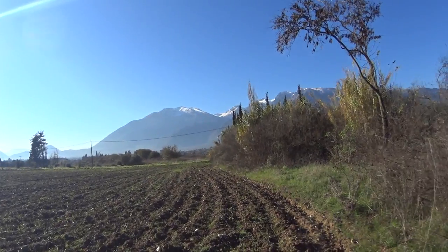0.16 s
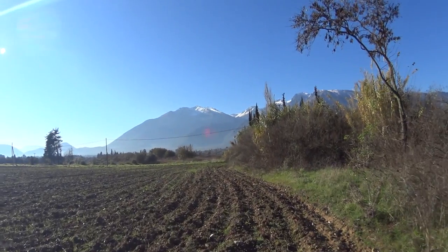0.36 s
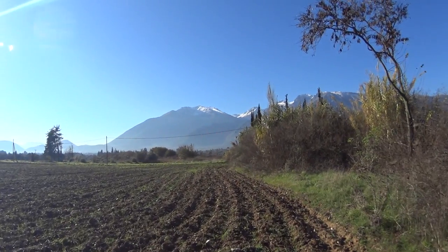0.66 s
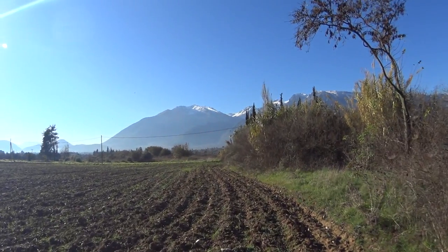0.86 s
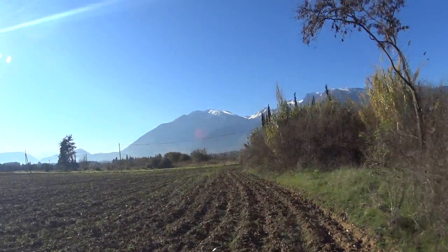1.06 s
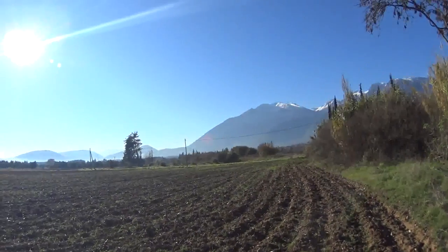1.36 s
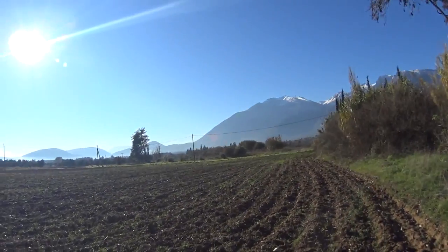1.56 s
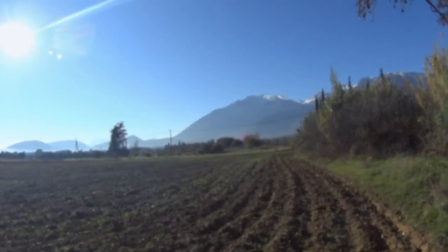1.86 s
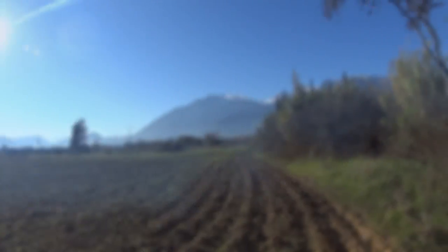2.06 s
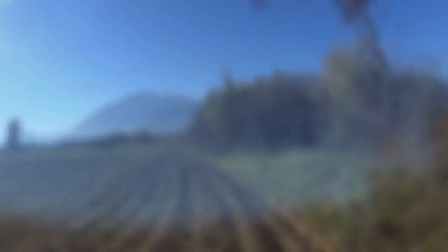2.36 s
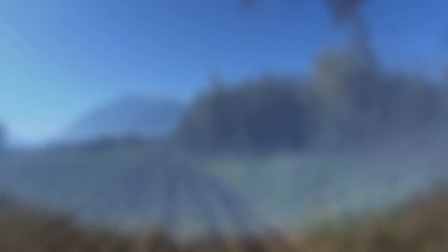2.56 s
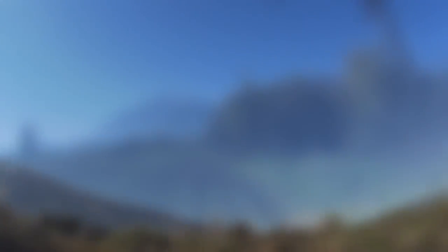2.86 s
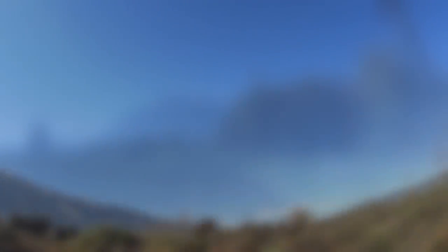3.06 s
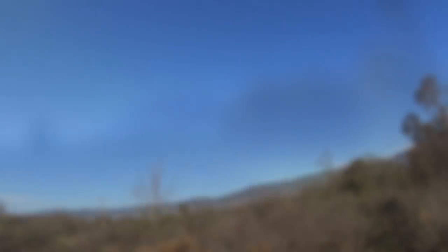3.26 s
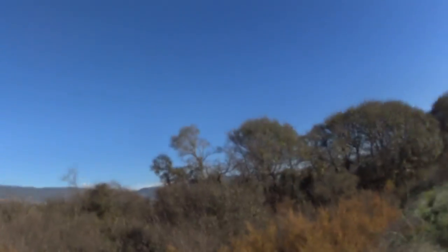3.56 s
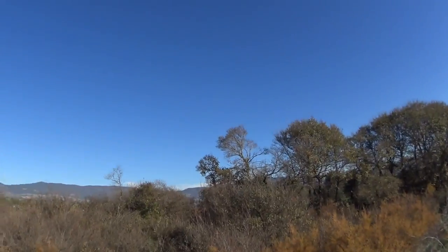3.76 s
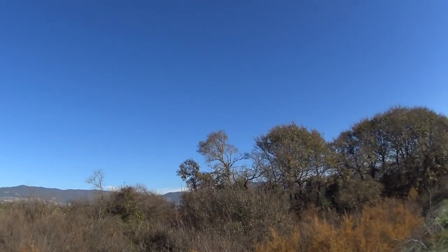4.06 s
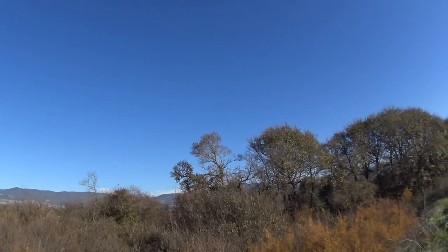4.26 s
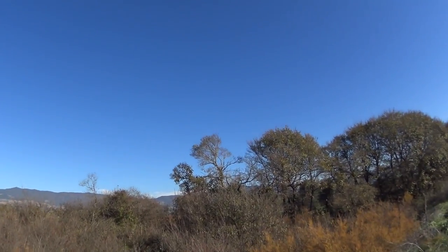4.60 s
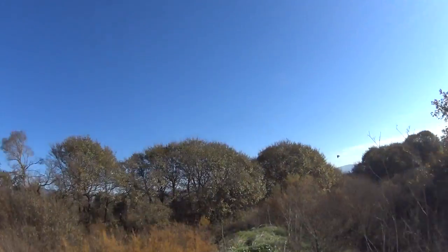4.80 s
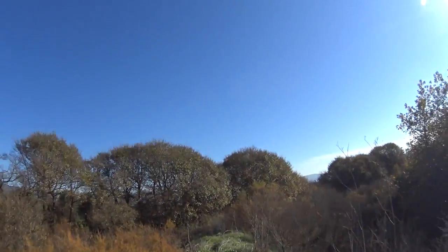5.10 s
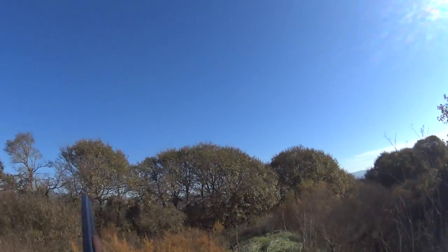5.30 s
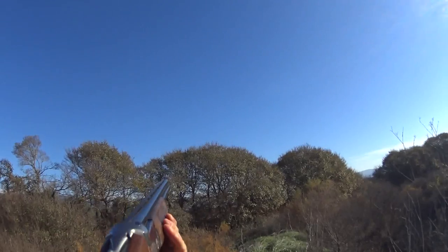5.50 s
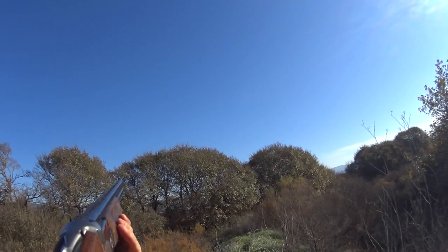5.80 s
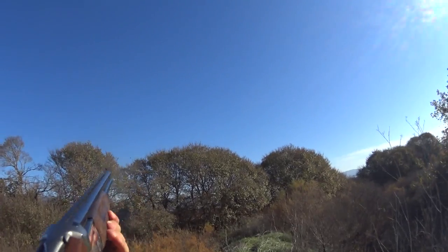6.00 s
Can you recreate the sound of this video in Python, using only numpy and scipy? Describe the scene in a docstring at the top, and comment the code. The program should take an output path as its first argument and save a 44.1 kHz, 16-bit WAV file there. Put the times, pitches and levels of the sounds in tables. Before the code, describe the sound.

A hunter stands in a still field wearing a small stereo camera on the head. Thin hiss, a faint far hum and sparse high chirps, with light cloth rustles, twig ticks and hollow housing knocks. After a calm middle, a hard knock and busy rustling mark the gun being raised. A brief lock rattle, then a shotgun blast very close, its dense roar still ringing when the sound stops.

```python
"""Soft air hiss, a faint far hum and bird chirps; cloth rustles, twigs tick, knocks ring, then a shotgun blast roars.
A hunter in a quiet field wears a small stereo camera on his head and raises his gun; the hammer falls and it fires.
Hiss, rustle, echoes and rumble are shaped noise; hum and birds are sines; most knocks are decaying housing tones.
A limiter in the camera holds the rolling echoes at an even roar."""
import sys
import numpy as np
from scipy import signal
from scipy.fft import rfft, irfft
from scipy.io import wavfile
from scipy.ndimage import uniform_filter1d

SR = 44100
rng = np.random.default_rng(int(sys.argv[2]) if len(sys.argv) > 2 else 0)


def wrap_up_sound(samples):
    """Save the sound to the file named by the first command line argument, as 16-bit audio."""
    columns = np.atleast_2d(samples).T
    # keep every value between -1 and 1, then stretch to whole-number steps
    tamed = np.clip(columns, -1, 1)
    steps = np.round(tamed * 32767).astype(np.int16)
    wavfile.write(sys.argv[1], SR, steps)


def invert_db(x):
    """Field ratio 10**(x/20) for x, a level in decibels (scalar or array-like)."""
    u = np.asarray(x, float) / 20
    return 10 ** u


N = 270906  # length in samples

# how alike the left and right sides of the quiet noises are: f/Hz, likeness (-1 to 1)
LIKENESS = [(60, -0.22), (170, 0.52), (490, -0.31), (1410, 0.34), (4050, 0.18), (11600, 0.58)]


def read(points, hz):
    """Value of a (f/Hz, value) table at the pitches hz, read along a log axis."""
    f, value = np.transpose(points)
    return np.interp(np.log(hz + 1), np.log(f + 1), value)


def curve(rows, t):
    """Value columns of a (t/s, ..) table at the times t."""
    s, *columns = np.transpose(rows)
    return [np.interp(t, s, c) for c in columns]


def evened(x):
    """Scales a signal to rms 1."""
    return x / np.sqrt(np.mean(x ** 2) + 1e-20)


def add(mix, s, sound, pan_db=0):
    """Adds a sound at s seconds, with the left side pan_db louder than the right."""
    part = mix[:, round(s * SR):][:, :sound.shape[-1]]
    part += sound[..., :part.shape[1]] * invert_db(np.array([[.5], [-.5]]) * pan_db)


def noise(length, size, field_db, same, patchy_db):
    """Stereo noise from random short-time spectra; field_db(hz, s) colours it, random patches drift through."""
    # left minus right level: f/Hz, level/dB
    side_lean = [(60, -0.5), (220, -1.5), (830, -1), (3110, -1), (11600, 0)]
    hz = np.fft.rfftfreq(size, 1 / SR)[:, None]
    t = np.arange(4 * length // size + 5) * size / 4 / SR
    a, b, c, d, patches = rng.standard_normal((len(t), len(hz), 5)).T
    patches = uniform_filter1d(patches, size // 64, 0)  # smooth over pitch
    patches = evened(uniform_filter1d(patches, 8192 // size, 1))  # smooth over time
    like = np.clip(read(same, hz), -1, 1)
    left = a + 1j * b
    right = like * left + np.sqrt(1 - like ** 2) * (c + 1j * d)
    lean_db = np.array([.5, -.5])[:, None, None] * read(side_lean, hz)
    spectra = np.array([left, right]) * invert_db(field_db(hz, t) + patchy_db * patches + lean_db)
    return signal.istft(spectra, nperseg=size, noverlap=size * 3 // 4)[1][:, :length]


def wavering(count, per_s, depth_db):
    """Random gain that changes about per_s times a second, by depth_db rms."""
    size = round(SR / per_s)
    drift = uniform_filter1d(uniform_filter1d(rng.standard_normal(count), size), size)
    return invert_db(depth_db * evened(drift))


def note(s, length, from_hz, to_hz, db, peak, start_db, end_db):
    """Pitch and level curve of a glide that swells to one peak, then fades towards its end level."""
    peak_hz = from_hz + 0.61 * (to_hz - from_hz)  # share of the glide done at the loudest moment
    return [(s, from_hz, db + start_db), (s + peak * length, peak_hz, db), (s + length, to_hz, db + end_db)]


def whistle(rows, fade_s):
    """A sine along a (t/s, f/Hz, rms level/dB) curve, faded at both ends."""
    t = np.arange(rows[0][0], rows[-1][0], 1 / SR)
    hz, db = curve(rows, t)
    fade = np.clip(np.minimum(t - t[0], t[-1] - t) / fade_s, 0, 1)
    turns = np.cumsum(hz) / SR + rng.random()
    return np.sqrt(2) * invert_db(db) * fade * np.sin(2 * np.pi * turns)


def fuzzy(length_s, from_hz, to_hz, width_hz):
    """A gliding band of noise that swells and fades: a sine multiplied by slow noise."""
    count = round(length_s * SR)
    size = max(round(SR / width_hz / 2), 1)
    breathy = evened(uniform_filter1d(uniform_filter1d(rng.standard_normal(count), size), size))
    glide = np.sin(2 * np.pi * np.cumsum(np.linspace(from_hz, to_hz, count)) / SR)
    return 2 * breathy * glide * signal.windows.tukey(count, .7)


def hiss():
    """Steady fine-grained self-noise of the two microphone capsules, at -66 dB rms."""
    # colour of the self-noise: f/Hz, level per Hz/dB (relative)
    capsule_colour = [(20, -30), (300, 13), (2000, -26), (5000, 1), (8000, -3.5), (11500, -4), (15000, -40)]
    grains = noise(N, 1024, lambda hz, t: read(capsule_colour, hz), LIKENESS, patchy_db=1.5)
    return invert_db(-66) * evened(grains)


def air():
    """Distant hiss of the still field, heard through the housing, with a slight flutter."""
    # colour of the field through the housing: f/Hz, level per Hz/dB (relative)
    field_colour = [(15, -32), (25, -6), (43, -25), (65, -16), (185, -10.5), (301, -14.5), (325, -31),
                    (351, -8), (1140, -8.5), (1370, -0.5), (1550, -14.5), (2280, -8.5), (3440, -14),
                    (10600, -27), (11500, -25), (15000, -70), (22000, -120)]
    # loudness over time, before a steady lift: t/s, level/dB
    field_level = [(0.0, -65), (1.1, -62), (1.4, -61.5), (2.3, -63), (2.78, -65.5), (3.78, -60.5),
                   (5.18, -59), (5.42, -54), (5.59, -58.5), (5.9, -58)]
    level_db, = curve(field_level, np.arange(N) / SR)
    flutter = wavering(N, per_s=230, depth_db=1.0)
    field = evened(noise(N, 1024, lambda hz, t: read(field_colour, hz), LIKENESS, patchy_db=.5))
    return invert_db(level_db + 4.5) * flutter * field  # 4.5 dB: the steady lift


def rustle():
    """Rubbing noise broken up by tiny slips; brush brightens it above the housing resonances."""
    # rubbing cloth and brush through the housing resonances: f/Hz, level per Hz/dB (relative)
    rub_colour = [(90, -31), (150, -19), (460, -9.5), (800, -14), (1150, -10.5), (1380, -5), (1600, -9),
                  (1870, -5.5), (2080, -12), (2330, -3.5), (2600, -12), (3000, -16.5), (4900, -6.5),
                  (7500, -18), (9800, -12.5), (11500, -14), (15000, -60)]
    # movements of the body: start/s, length/s, level before a 1 dB lift/dB, treble tilt/dB
    moves = [(0.162, 0.12, -53.5, -10.5), (0.31, .08, -58, -32), (0.44, 0.11, -59, -13),
             (0.633, 0.18, -62, -4), (0.885, 0.22, -53.5, -12.5), (1.03, 0.32, -55, -17.5),
             (1.41, 0.2, -64, -9), (1.642, 0.29, -56, -0.5), (1.895, 0.27, -58.5, -13),
             (2.176, 0.48, -56.5, -9), (2.302, 0.14, -52, -8), (2.581, 0.082, -55.5, -36),
             (2.758, 0.91, -57.5, -18.5), (3.193, 1.5, -61.5, -22), (3.415, 0.15, -60.5, -31),
             (4.425, .06, -65, 2), (4.515, 0.036, -63, -19), (4.812, 0.05, -54, -26),
             (5.068, 0.21, -55.5, -17), (5.209, 0.37, -45.5, -11.5), (5.438, 0.14, -53, -7),
             (5.503, 0.39, -55.5, -18)]
    rise, fall = 0.16, 0.4  # shares of each movement's length
    rest_db, rest_bright_db = -70.5, -2  # standing still: level before the lift, treble tilt
    t = np.arange(N) / SR
    s, length, db, bright_db = np.transpose(moves)[:, :, None]
    done = (t - s) / length
    swell = np.clip(np.minimum(done / rise, (1 - done) / fall), 0, 1)
    power = (invert_db(db) * swell) ** 2
    rest_power = invert_db(rest_db) ** 2
    total = power.sum(0) + rest_power
    top_db = ((power * bright_db).sum(0) + rest_power * rest_bright_db) / total

    def field_db(hz, at):
        """Rubbing colour, with a treble tilt that sets in at 3 kHz and is complete at 9 kHz."""
        treble = np.clip(np.log2(hz / 3000 + 1e-3) / 1.58, 0, 1)
        return read(rub_colour, hz) + np.interp(at, t, top_db) * treble

    strength = invert_db(3.6 * np.minimum(rng.exponential(1, N), 6))
    slips = strength * (rng.random(N) < 300 / SR)  # about 300 slips a second
    fading = signal.lfilter([1], [1, -np.exp(-1 / (0.0017 * SR))], slips)  # each dies over 1.7 ms
    grain = evened(2.24 + fading)
    return np.sqrt(total) * invert_db(1.0) * grain * evened(noise(N, 512, field_db, LIKENESS, patchy_db=3.5))


def buffet():
    """Lumpy rumble as the head moving in the air shakes the capsules; each shake swells fast and dies slower."""
    # shakes: peak t/s, level/dB
    shakes = [(.01, -73), (.2, -63), (.41, -69), (.97, -57), (1.08, -62), (1.52, -63.5), (1.76, -57),
              (2.3, -66), (2.42, -59), (2.63, -67), (3.2, -63), (3.41, -63.5), (4.75, -67), (5.17, -46),
              (5.23, -48), (5.3, -48), (5.4, -43), (5.49, -49), (5.6, -56.5), (5.96, -53)]
    rise_db_per_s, fall_db_per_s, rest_db = 165, 110, -74

    def field_db(hz, t):
        """Falls off above about 60 Hz; nearly nothing below 15 Hz."""
        return -20 * np.log10(1 + (hz / 60) ** 2) - 100 * (hz < 15)

    rumble = noise(N, 2048, field_db, [(20, 0.93), (300, 0.99)], patchy_db=3.0)  # nearly alike on both sides
    s, db = np.transpose(shakes)[:, :, None]
    after = np.arange(N) / SR - s
    level_db = (db - np.maximum(-rise_db_per_s * after, fall_db_per_s * after)).max(0)
    return np.hypot(invert_db(level_db), invert_db(rest_db)) * evened(rumble)


def hum():
    """Faint far tones; the air they cross makes them waver, the higher the faster and deeper."""
    # steady tones that come and go: start/s, length/s, f/Hz, rms level at the peak before wavering/dB
    tones = [(0, .55, 647.5, -64), (.4, .43, 647.5, -68), (0, .4, 336, -70), (.35, .55, 326, -68),
             (1.15, .56, 338, -62.5), (1.7, 1.85, 335.5, -70), (1.05, .65, 288, -71),
             (1.08, .24, 1868, -64), (1.53, .08, 1850, -66), (1.92, .38, 1870, -66.5)]
    out = np.zeros((2, N))
    for s, length, hz, db in tones:
        rows = note(s, length, hz, hz, db, peak=0.34, start_db=-6, end_db=-7)
        tone = whistle(rows, fade_s=0.0083)
        waver = wavering(len(tone), hz / 9, depth_db=1.7 * np.sqrt(hz / 330))
        add(out, s, tone * waver, pan_db=-2.5)
    return out


def birds():
    """Near-sine chirps, the fainter the hazier; the hedge scatters each into a short fluttering echo."""
    # notes of far birds: start/s, length/s, from f/Hz, to f/Hz, rms level at the peak before haze/dB
    chirps = [(0.026, 0.082, 4650, 4720, -69), (0.121, .05, 4500, 4250, -74),
              (1.324, 0.079, 4400, 4700, -62), (1.39, 0.053, 4510, 4180, -65),
              (1.444, 0.02, 4130, 3980, -67), (1.979, 0.052, 2486, 2545, -60),
              (2.025, 0.13, 2680, 2640, -69), (2.299, 0.085, 4760, 4540, -58),
              (2.613, 0.047, 4680, 4560, -70), (2.65, .05, 4350, 4200, -69), (2.705, 0.1, 4630, 4330, -70),
              (4.426, 0.023, 10400, 7360, -54.5)]
    # call of the near bird, a sweep up into a held note: t after its start before stretching/s, f/Hz,
    # level relative to the call/dB
    call = [(0, 2250, -36), (.014, 2780, -21), (.027, 3350, -18), (.037, 3950, -11), (.041, 4080, -15),
            (.045, 4180, 0), (.055, 4290, 0), (.08, 4260, -2), (.088, 4200, -5)]
    # when the near bird calls: start/s, level/dB, time stretch (factor)
    calls_at = [(.743, -43, 0.99), (2.222, -43, 0.97)]
    # hoarse start of the call, a noise band: length/s, from f/Hz, to f/Hz, width/Hz
    rasp = (.042, 4300, 5600, 900)
    rasp_lead_s, rasp_db = .008, -16  # starts ahead of the call; gain relative to it
    overtone_s, overtone_db = .022, -18  # the octave that sounds along while the pitch is low
    out = np.zeros((2, N))
    songs = [note(*row, peak=0.4, start_db=-4, end_db=-5.5) for row in chirps]
    for s, db, stretch in calls_at:
        songs.append([(s + stretch * after, hz, db + step_db) for after, hz, step_db in call])
        low = curve(call, [0, overtone_s])[0]
        octave_db = db + overtone_db
        songs.append([(s, 2 * low[0], octave_db), (s + stretch * overtone_s, 2 * low[1], octave_db)])
        add(out, s - rasp_lead_s, invert_db(db + rasp_db) * fuzzy(*rasp))
    for rows in songs:
        tone = whistle(rows, fade_s=.006)
        faint_db = -38 - max(row[2] for row in rows)
        haze = wavering(len(tone), per_s=500, depth_db=0.16 * faint_db)
        add(out, rows[0][0], tone * haze, pan_db=-2.0)
    t = np.arange(SR // 2) / SR
    signs = rng.choice([-1., 1.], (2, len(t)))
    hits = rng.random((2, len(t))) < 1500 / SR  # about 1500 reflections a second
    leaves = signs * hits * invert_db(-60 * t / 0.38) * (t > .015)  # none in the first 15 ms
    echo = signal.fftconvolve(out, leaves / np.linalg.norm(leaves[0]), axes=1)[:, :N]
    return out + invert_db(-8.5) * echo


def ticks():
    """A noise burst around the pitch of the thing that snaps or bumps; it rises within about one cycle."""
    # dry twigs and straps; those near 1300 Hz are light knocks ringing the housing:
    # t/s, peak level/dB, centre f/Hz, left minus right/dB, width/octaves
    snaps = [(.097, -50, 7000, -.5, .7), (.176, -49, 8500, -1, .6), (.2274, -42, 9500, -1, 0.36),
             (0.227, -45, 4700, -1, .32), (0.2795, -47.5, 5260, 0, .28), (0.5229, -34.5, 3230, -2, 0.57),
             (0.5293, -44, 4170, -1.5, 0.27), (.5584, -46.5, 4120, -.5, .27), (0.9456, -46, 4080, -1, .27),
             (.9814, -45, 3520, 1, .55), (1.0431, -33.5, 3840, -1, .24), (1.78, -41, 9000, -2, .5),
             (1.83, -43, 5900, -2, 0.23), (2.032, -46, 4200, -.5, .34), (2.9578, -36, 7000, 0, 1.2),
             (2.971, -45, 5000, 0, 1.3), (3.564, -43, 1260, -1, 0.18), (3.578, -43, 1300, -1, 0.091),
             (3.706, -49, 1320, -1, 0.11), (4.054, -46, 1330, -1, 0.16), (5.007, -43.5, 1330, -2, 0.17),
             (5.19, -42, 5000, 2, .31), (5.2295, -39, 6500, 9, 0.76), (5.25, -37, 4480, 0, .14),
             (5.319, -34, 4970, 0, 0.28), (5.374, -43, 4470, 0, .12), (5.393, -34.5, 1100, -2, 0.73),
             (5.408, -42.5, 5900, 15, 0.17), (5.452, -41, 5700, 1, .15), (5.567, -45, 7500, -2, .56),
             (5.706, -39, 4640, -4, 0.2), (5.711, -38.5, 4350, -3, 0.096), (5.726, -47, 4400, -3, .3)]
    # soft low bumps of the body: t/s, peak level/dB, centre f/Hz, left minus right/dB, width/octaves
    bumps = [(.184, -53, 283, 1, .18), (1.7, -59, 375, 5, 0.065), (2.309, -55, 212, -1, 0.26),
             (2.369, -57, 396, -3, .16), (3.79, -53, 843, -4, 0.11), (5.169, -37.5, 160, -2, 0.7),
             (5.216, -53, 200, -4, .58), (5.262, -47.5, 151, -1, 0.33), (5.385, -58, 128, -3, .35),
             (5.488, -63, 130, 1, 0.28)]
    events = snaps + bumps
    out = np.zeros((2, N))
    t = np.arange(8192) / SR
    bins = np.fft.rfftfreq(len(t), 1 / SR)
    draws = rng.standard_normal((len(events), 2, len(t)))
    for (s, db, hz, pan_db, width), (a, b) in zip(events, draws):
        colour = 1 / (1 + (np.log2(bins / hz + 1e-6) / max(width, .03)) ** 4)
        t60 = 0.033 * (hz / 1000) ** -0.67  # seconds to fall 60 dB; high snaps die sooner
        shape = invert_db(-60 * t / t60) * (1 - np.exp(-t * hz / 0.65))
        both = np.array([a + 0.048 * b, a - 0.29 * b])  # slightly different left and right
        burst = irfft(rfft(both) * colour) * shape
        add(out, s, invert_db(db) * burst / abs(burst.mean(0)).max(), pan_db)
    return out


def knocks():
    """Each blow rings the modes of the camera housing; a hard blow favours the high ones."""
    # ringing modes of the housing: f/Hz, level/dB (relative), time to fall 60 dB/s
    modes = [(502, -1, 0.0098), (820, -7.5, 0.029), (1024, -39, 1), (1124, 5.5, 0.013), (1322, 7.5, 0.01),
             (2048, 3.5, 0.012), (2230, -27, 0.0022), (3830, -11.5, 0.0085), (4700, 5, 0.0025),
             (5900, -10, 0.0059), (7000, -36, 0.0097)]
    # blows: t/s, peak level/dB, hardness/dB per octave, left minus right/dB
    blows = [(0.655, -53, -20, 0.0), (0.9989, -19, 6, -5.5), (1.045, -39, 2, -1), (2.383, -35.5, -4, -6),
             (2.922, -40.5, 0, -5), (3.174, -29.5, 4.5, -4), (3.212, -42, 5, 0.5), (3.404, -48.5, 4, -19),
             (4.575, -45, 0, -3), (4.732, -28.5, 1.5, -4), (5.112, -36, 7, -3), (5.1713, -5.5, 1, -5),
             (5.207, -28.5, 5.5, -3), (5.217, -31.5, -7, -3), (5.334, -29.5, 8, -2), (5.426, -22, 8, -6),
             (5.502, -32.5, 3.5, -0.5), (5.52, -36.5, 4, -7)]
    out = np.zeros((2, N))
    t = np.arange(SR // 2) / SR
    hz, mode_db, t60 = np.transpose(modes)[:, :, None]
    spots = rng.standard_normal((len(blows), 2, len(modes), 1))
    for (s, db, hardness, pan_db), spot in zip(blows, spots):
        # every blow lands on another spot, so strength and phase of the modes vary a little
        tilt_db = hardness * np.log2(hz / 1500)
        strength = invert_db(mode_db + tilt_db + 0.5 * spot[0] - 60 * t / t60)
        tones = strength * np.sin(2 * np.pi * hz * t + .4 * spot[1])
        ring = tones.sum(0) * (1 - np.exp(-t / 0.00061))  # soft 0.61 ms onset
        add(out, s, invert_db(db) * ring / abs(ring).max(), pan_db)
    return out


def scrapes():
    """Cloth dragged over the housing makes narrow bands of hiss at several pitches; each stutters."""
    # drags: start/s, length/s, starting f/Hz, width/Hz, gain/dB
    drags = [(2.318, 0.064, 2396, 200, -74), (3.461, .75, 1390, 159, -66), (4.1, 1.05, 1382, 157, -67),
             (3.978, 0.82, 2350, 248, -67.5), (5.062, 0.06, 760, 120, -65), (5.28, 0.12, 1856, 250, -52.5),
             (5.317, 0.019, 5210, 1500, -48.5), (5.319, 0.151, 2393, 201, -49),
             (5.462, 0.16, 2360, 300, -64), (5.468, 0.019, 5900, 1500, -50)]
    out = np.zeros((2, N))
    for s, length, hz, width_hz, db in drags:
        rub = fuzzy(length, hz, 0.94 * hz, width_hz)  # the pitch sags a little
        stutter = wavering(len(rub), per_s=90, depth_db=2.5)
        add(out, s, invert_db(db) * rub * stutter, pan_db=-1.2)
    return out


def shot():
    """Lock rattles, the pressure front, dense echoes that lose their treble, a late low echo, a low jolt."""
    # lock of the gun before the blast: t/s, starting level before a soft onset/dB, time to fall 60 dB/s
    lock = [(5.964, -21, 0.016), (5.9721, -23.5, 0.024), (5.978, -12, 0.025)]
    # echoes off ground, hedges and trees: f/Hz, level per Hz/dB (relative)
    echo_colour = [(24, -38), (40, -8), (81, -4), (200, -8.5), (322, -12), (610, -7.5), (720, -31),
                   (1360, -1.5), (1770, -7.5), (2190, -2.5), (3780, -6.5), (5650, -1.5), (7510, -12),
                   (10700, -5.5), (11500, -15), (15000, -57), (22000, -120)]
    # decay of the echoes: f/Hz, time to fall 60 dB/s
    echo_t60 = [(200, 0.4), (600, 2.2), (1500, 2.4), (4000, 2.1), (8000, 0.74), (11000, 0.57)]
    # left-right likeness of the echoes: f/Hz, likeness (-1 to 1)
    echo_likeness = [(60, 0.62), (140, 0.66), (350, 0.57), (830, 1), (2010, 0.69), (4820, 0.89),
                     (11600, 0.7)]
    blast_s, blast_db = 5.9818, 6.5  # moment; peak level of the crack before the limiter
    push_s, scatter_t60 = 0.0004, 0.04  # length of the push; decay of its scatter, seconds
    late_s, late_hz, late_db = .12, 804, 7.5  # late echo: delay, upper pitch, gain of the lows when it arrives
    recoil_s, recoil_half_s, recoil_hz = 6.05, 0.0092, 82  # the shoulder jolt reaches the head
    out = np.zeros((2, N))
    length = SR // 4
    t = np.arange(length) / SR

    for s, db, t60 in lock:
        clatter = noise(length, 128, lambda hz, _: read(echo_colour, hz), echo_likeness, patchy_db=-1.0)
        add(out, s, evened(clatter) * invert_db(db - 60 * t / t60) * (1 - np.exp(-t / 0.00062)))

    u = t / push_s
    push = (1 - u) * np.exp(-u)  # pressure jumps up, then dips below rest
    scatter = invert_db(-60 * t / scatter_t60) * (1 - np.exp(-t / 0.00049))  # barrel and arms scatter it
    a, b, c = rng.standard_normal((3, length)) * scatter
    both = np.array([a + 0.5 * b, a - 0.5 * b])
    crack = signal.fftconvolve(both, np.diff(push, prepend=0)[None], axes=1)[:, :length]
    add(out, blast_s, invert_db(blast_db) * crack / abs(crack).max())

    # the front passes sideways across the head and pushes the two capsules opposite ways
    shove = signal.sosfilt(signal.butter(2, [450, 1500], "band", fs=SR, output="sos"), c)
    add(out, blast_s + 0.00088, invert_db(-2.5) * np.array([[1], [-1]]) * shove / abs(shove).max())

    # each front rings the housing
    cavity = np.sin(2 * np.pi * 1320 * t) * invert_db(-60 * t / 0.064) * (1 - np.exp(-t / 0.0018))
    add(out, blast_s + 0.00289, invert_db(4) * cavity)
    add(out, blast_s + late_s, invert_db(-0.5) * cavity)

    def echo_db(hz, s):
        """Fading echo colour; the lows are held down until the late echo arrives."""
        waiting = 1 / (1 + np.exp((s - late_s) / 0.0019))
        held_db = late_db * waiting / (1 + (hz / late_hz) ** 6)
        return read(echo_colour, hz) - 60 * s / np.maximum(read(echo_t60, hz), .1) - held_db

    echoes = evened(noise(length, 256, echo_db, echo_likeness, patchy_db=2.0))
    rough = wavering(length, per_s=590, depth_db=1.5)  # single trunks and furrows roughen the roar
    add(out, blast_s, invert_db(-4) * rough * echoes * (1 - np.exp(-t / 0.0035)))

    jolt = signal.windows.hann(round(2 * recoil_half_s * SR))
    thump = jolt * np.sin(2 * np.pi * recoil_hz * t[:len(jolt)])
    add(out, recoil_s - recoil_half_s, invert_db(-14) * thump)
    return out


def scene():
    """All sources at the two capsules."""
    quiet = hiss() + air() + rustle() + buffet() + hum() + birds()
    return quiet + ticks() + knocks() + scrapes() + shot()


def band_limit(x):
    """A steep low-pass at the top of the band."""
    return signal.sosfilt(signal.butter(12, 12200, fs=SR, output="sos"), x)


def record(dry):
    """The camera: a limiter that needs a few ms to close, a soft ceiling and a treble cut-off."""
    limit_db, recovery_db_per_s, attack_s = -14.5, 300, 0.0023
    keep = np.exp(-1 / (attack_s * SR))
    power = signal.lfilter([1 - keep], [1, -keep], (dry ** 2).mean(0))
    power_db = 10 * np.log10(power + 1e-12)
    # hold each peak, then let it sink at the recovery rate
    fall = np.arange(N) * recovery_db_per_s / SR
    held_db = np.maximum.accumulate(power_db + fall) - fall
    over_db = np.maximum(held_db - limit_db, 0)
    cut_db = 1.058 * signal.lfilter([1 - keep], [1, -keep], over_db)  # takes off slightly more than the excess
    limited = np.tanh(dry / invert_db(cut_db))  # tanh is the soft ceiling
    edge = signal.firwin(1023, 11060, window=("kaiser", 7), fs=SR)  # low-pass at 11060 Hz
    finished = signal.oaconvolve(limited, edge[None], "same")
    return band_limit(finished)


dry = scene()
out = record(dry)
wrap_up_sound(out)
```